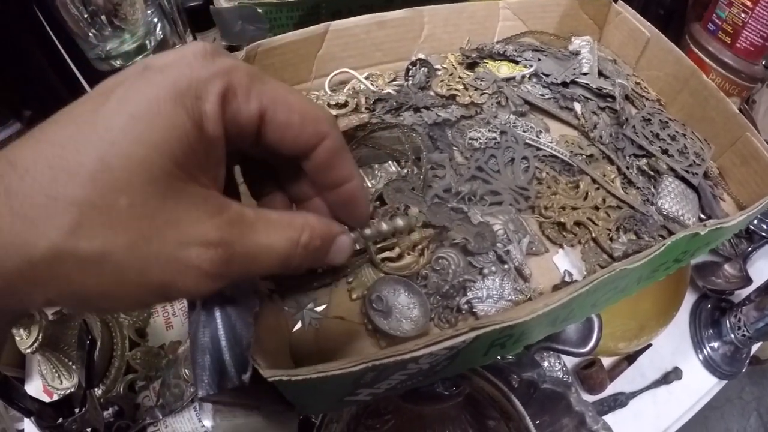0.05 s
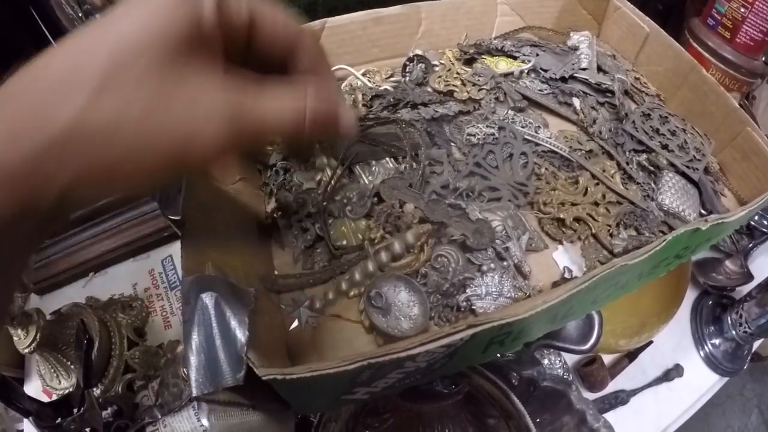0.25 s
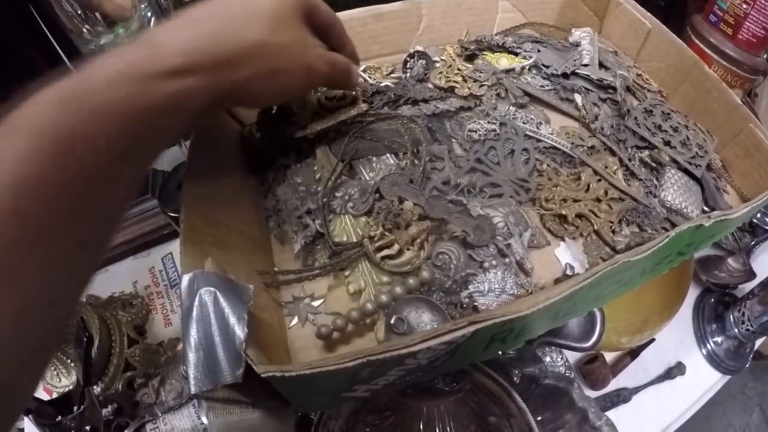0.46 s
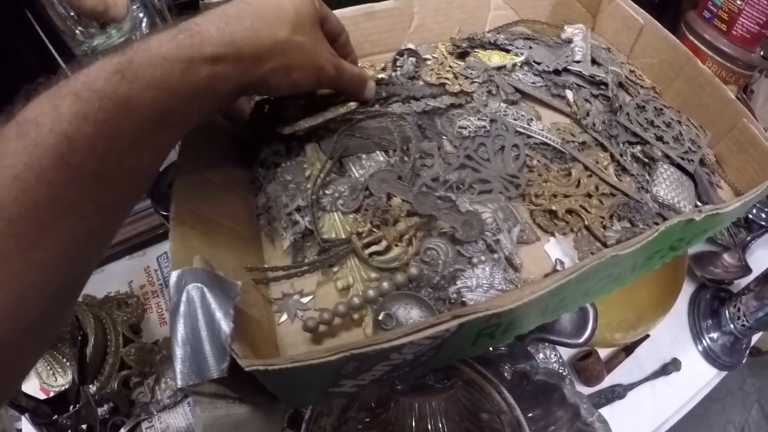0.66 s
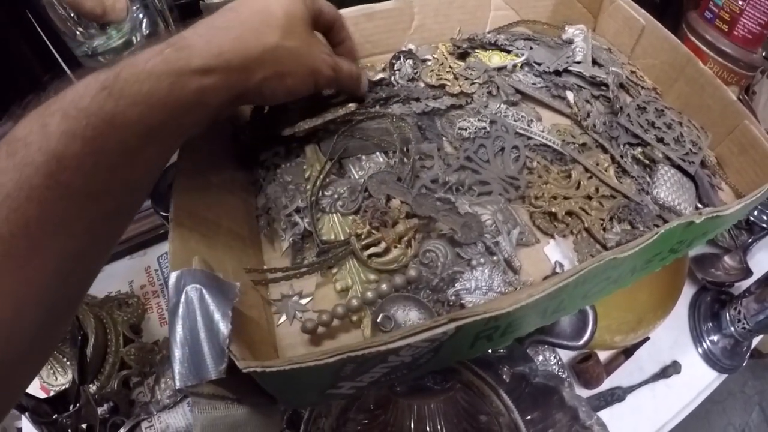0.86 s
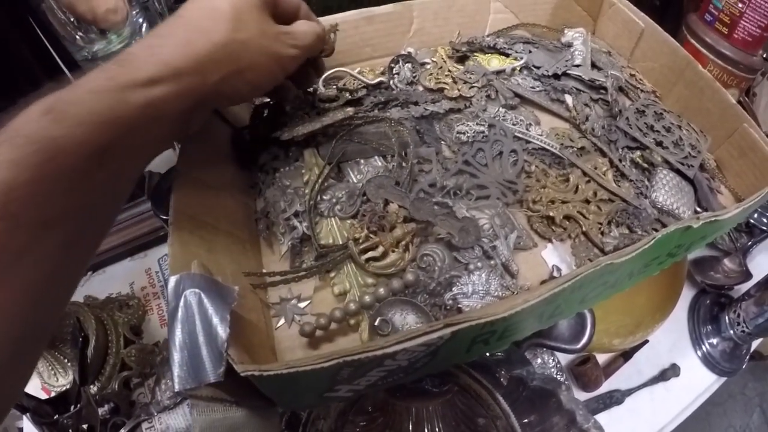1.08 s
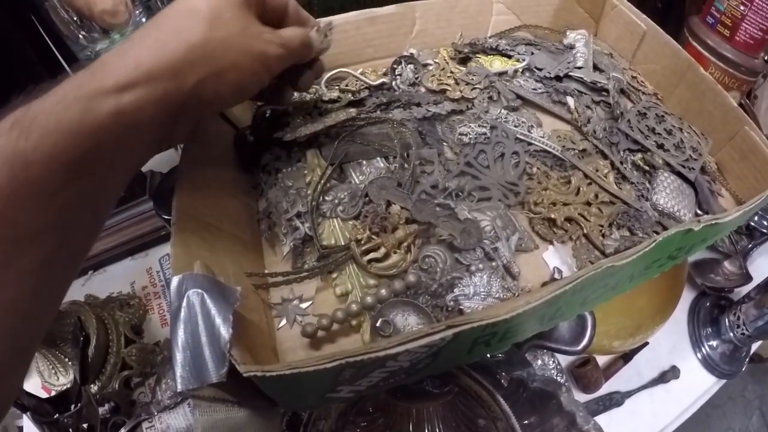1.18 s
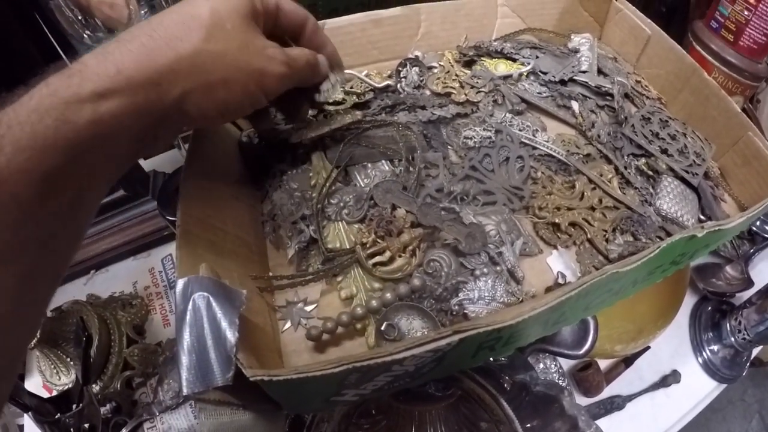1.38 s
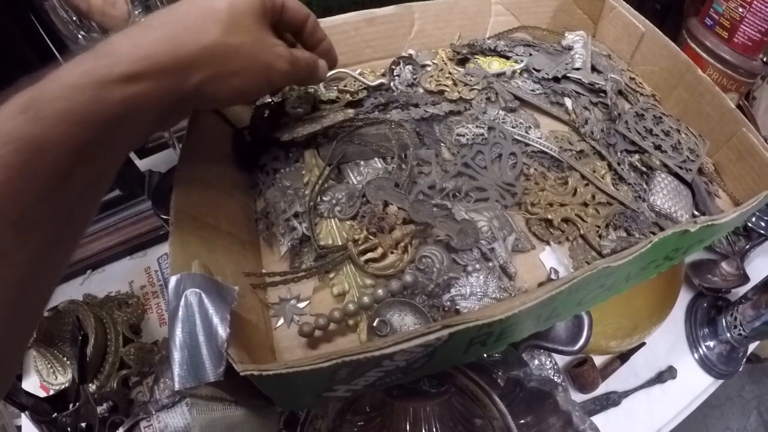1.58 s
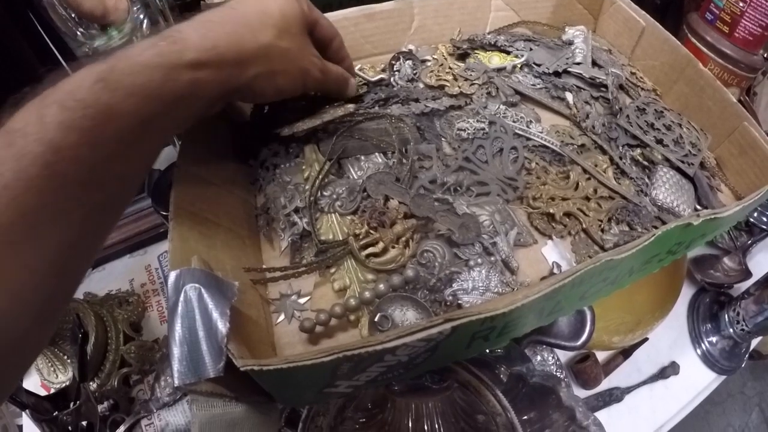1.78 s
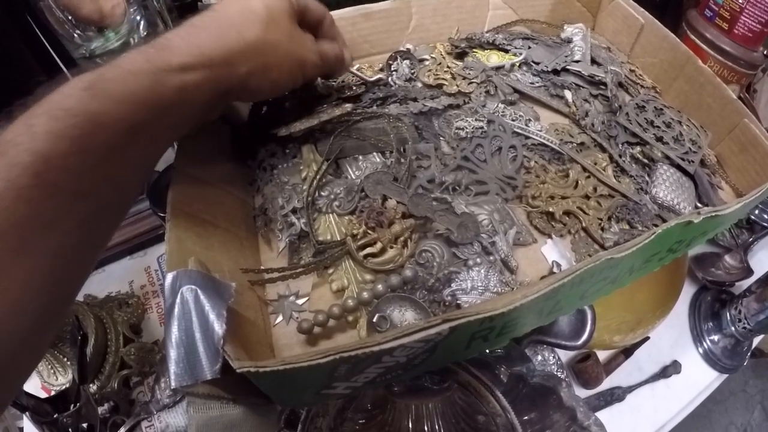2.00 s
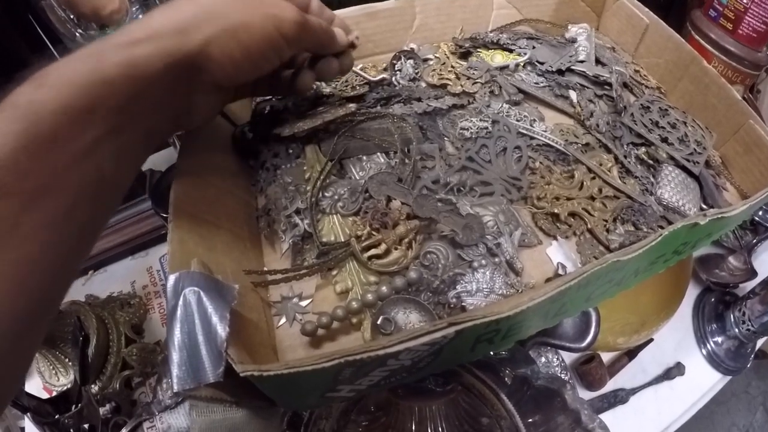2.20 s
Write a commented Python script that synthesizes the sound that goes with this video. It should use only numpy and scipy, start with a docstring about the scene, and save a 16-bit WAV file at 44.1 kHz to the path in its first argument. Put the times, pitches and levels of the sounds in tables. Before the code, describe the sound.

Metal trinkets clatter in a cardboard box: a beaded piece drops, then fingers rummage with light scrapes

```python
"""Small metal trinkets in a cardboard box, heard up close in a quiet storeroom. A beaded piece is dropped and
bounces in the near corner, then fingers rummage in the far corner. Every contact is a burst of tiny collisions
that knocks the cardboard and rattles the damped metal; scrapes are longer streams of the same collisions.
One thin piece rings freely as dying sine tones, joined by single tinkling tones. The room adds a short echo
tail, and filtered noise makes its hiss and low rumble."""
import sys
import numpy as np
from scipy import signal
from scipy.fft import rfft, irfft, next_fast_len
from scipy.io import wavfile

SR = 44100
rng = np.random.default_rng(int(sys.argv[2]) if len(sys.argv) > 2 else 0)


def digitize_waveform(pressure):
    """Quantize a signal to 16-bit integers and store it at the path in sys.argv[1].

    Rows of a 2-D input are taken as channels; values are limited to [-1, 1].
    """
    field = np.atleast_2d(pressure).T
    bounded = np.clip(field, -1, 1)
    quanta = np.round(bounded * 32767).astype(np.int16)
    wavfile.write(sys.argv[1], SR, quanta)


N = 99225

# Contacts in the box: start_s, level_db, pitch_hz (knock), rattle_db, treble_db (of the rattle),
# thump_db (box floor), t60_s (time for the burst to fall 60 dB), tone_db (knock's own tone).
# The dB columns after level_db are relative to it, before the shared levels below.
CONTACTS = [(0.216, -6.5, 836, -13, -10.5, -12, 0.041, -11),
            (0.221, -6.5, 1260, -14, -16.5, -26, 0.05, -10.5), (0.23, -15.5, 556, -7, -9, -25, 0.039, 0),
            (0.248, -20.5, 830, -13, -15, -11, 0.069, -7), (0.271, -23, 620, -7.5, -12, -24, 0.07, -7),
            (0.313, -6.5, 1642, -17, -12, -27.5, 0.042, -7.5),
            (0.318, -5, 1354, -17, -14.5, -50, 0.026, -1.5), (0.334, -29.5, 584, -26, -24, 9, 0.1, 6),
            (0.368, -12, 710, -11, -19.5, -26, 0.048, -3), (0.384, -19, 600, -16, -31, -8.5, 0.043, -17),
            (0.42, -14.5, 732, -14.5, -26, -25, 0.042, 3.5), (0.449, -18.5, 567, -8.5, -16, -11, 0.053, -4),
            (0.467, -21, 684, -11, -43, -40, 0.034, -2.5), (0.484, -22, 775, -30, -36, -21, 0.013, 2),
            (0.504, -24.5, 675, -26, -35, -28, 0.062, -16), (0.52, -28, 1290, -15, -23, -21, 0.085, -7),
            (0.54, -16, 1320, -24, -26, -27, 0.028, -2), (0.544, -15.5, 626, -25, -23, -18, 0.041, -5.5),
            (0.562, -22, 660, -14, -11, -14, 0.05, 1.5), (0.573, -33, 777, -3, -7, -5, 0.066, -10),
            (0.592, -28, 657, -18, -26, -13, 0.044, 1), (0.615, -27, 650, -21, -32, -24, 0.1, -7),
            (0.632, -13.5, 882, -15.5, -20, -6.5, 0.045, -3),
            (0.64, -3.5, 1168, -23, -25.5, -42, 0.05, -3.5), (0.647, -15, 1325, -21, -19, -16, 0.092, -6),
            (0.658, -6, 1040, -18, -25, -19, 0.023, -2), (0.676, -21.5, 944, -17, -21.5, -36, 0.066, -17),
            (0.695, -33, 740, -11, -24, -14, 0.036, -2), (0.747, -30.5, 1070, -11, -19, -26, 0.04, -13),
            (0.749, -18, 1170, -20, -25, -28, 0.039, -0.5), (0.765, -14, 910, -17, -25, -21.5, 0.044, -7),
            (0.786, -14.5, 1030, -17, -20.5, -15, 0.06, -15),
            (0.803, -18.5, 1206, -11, -26, -21, 0.05, -10), (0.815, -16, 1060, -18, -34, -15, 0.031, -9),
            (0.823, -21.5, 814, -18, -34, -30, 0.022, -7),
            (0.848, -21.5, 1054, -15.5, -22, -12, 0.026, -5.5),
            (0.866, -20, 690, -13, -25, -16, 0.039, -10), (0.88, -13.5, 870, -19, -30, -14.5, 0.032, -4),
            (0.89, -18.5, 880, -28, -35, -13, 0.045, -8), (0.898, -27, 825, -15, -33, -35, 0.055, -1.5),
            (0.914, -25.5, 1010, -19, -24, -15, 0.072, -13), (0.934, -22, 1110, -14, -41, -39, 0.04, -9),
            (0.947, -14.5, 1660, -28, -19.5, -34, 0.03, -17), (0.962, -34.5, 1130, -20, 3, -24, 0.043, 5),
            (0.987, -19.5, 805, -14, -17, -16, 0.038, -17), (1.002, -29, 725, -19, -10, -16, 0.035, 3),
            (1.013, -25.5, 950, -26, -4, -15, 0.075, -8), (1.018, -19, 1014, -6, -49, -18, 0.056, -14),
            (1.054, -27, 944, -28, -34, -30, 0.052, -5.5), (1.076, -25.5, 1060, -15, -23, -14, 0.063, -9),
            (1.089, -35.5, 1060, -17, -16, -8, 0.028, -23), (1.122, -30.5, 908, -23, -42, -11, 0.04, -2.5),
            (1.161, -42.5, 946, -34, -36, 0, 0.15, -7.5), (1.513, -23.5, 964, -3, -2, -29, 0.035, -9),
            (1.523, -23.5, 984, -15, -4, -28, 0.055, -3.5),
            (1.584, -37.5, 1070, -15, -15, -8.5, 0.054, -10), (1.618, -35, 1090, -17, 3, -27, 0.16, -14),
            (1.624, -25, 640, -13, -10, -19, 0.025, -3), (1.627, -17, 980, -12.5, -12.5, -25, 0.049, -16),
            (1.635, -16.5, 870, -13, -3, -28, 0.027, -19), (1.646, -25.5, 1156, -12, -30, -33, 0.13, -25),
            (1.654, -25, 1052, -8, -7, -31, 0.032, -13), (1.666, -21.5, 663, -10, -9.5, -38, 0.038, -8.5),
            (1.703, -32, 681, -26, -41, -15, 0.11, -8), (1.72, -34, 630, -12, -29, -32, 0.023, -7),
            (1.847, -32, 1050, -29, -31, -5.5, 0.07, -4.5),
            (1.855, -16.5, 1472, -23.5, -29, -19, 0.034, -11.5),
            (1.866, -23, 1146, -22.5, -28, -37, 0.091, -11),
            (1.878, -15, 866, -23.5, -29, -12.5, 0.091, -14),
            (1.886, -17.5, 980, -26, -35, -22, 0.062, -13), (1.896, -16.5, 1088, -21, -37, -22, 0.061, 2.5),
            (1.911, -13, 1110, -26, -22, -45, 0.042, -18),
            (1.917, -17.5, 1220, -14.5, -37, -32, 0.045, -30), (1.94, -24.5, 1050, -14, -28, -3, 0.044, -6),
            (1.958, -27, 1020, -24, -27, -18, 0.05, -7), (1.965, -16, 978, -27, -28, -13.5, 0.045, -12.5),
            (1.974, -28.5, 1104, -18, -36, -6, 0.13, -13), (1.998, -26, 850, -24, -15, -12, 0.047, -5),
            (2.015, -33, 1190, -8.5, -33, -7, 0.05, -7), (2.036, -29.5, 710, -20, -31, -21, 0.083, -11),
            (2.055, -28, 810, -9, -28, -9, 0.032, -7.5)]
# Scraping strokes, each a list of points: time_s, cardboard_db, metal_db
SCRAPE_STROKES = [
    [(0.21, -75, -70), (0.27, -42, -51), (0.386, -30, -44.5), (0.438, -29.5, -44), (0.578, -51, -68),
     (0.725, -49, -69)],
    [(0.725, -43, -60), (0.819, -38, -47.5), (0.909, -37.5, -75), (0.967, -44, -47), (1.057, -63, -69),
     (1.191, -52, -69.5), (1.35, -69.5, -78.5)],
    [(1.5, -73.5, -78), (1.622, -60.5, -59.5), (1.748, -66, -75), (1.8, -62, -68)],
    [(1.83, -66, -73), (2.014, -56, -75), (2.15, -65, -73)],
]
# Resonances of the cardboard in the near and far corners: pitch_hz, width_hz, level_db
NEAR_CORNER = [(698, 105, 7.5), (1453, 160, 2), (1594, 116, 2), (2203, 130, 0), (2704, 56, -7)]
FAR_CORNER = [(280, 87, -1), (683, 243, 4.5), (870, 130, 5.5), (1142, 266, 1), (1343, 1300, -16.5),
              (2000, 300, -11.5), (2750, 600, -16)]
# Broad tone colour of the cardboard: pitch_hz, level_db (relative)
CARD_COLOUR = [(59, -52), (100, -22), (389, -2), (710, 2.5), (1010, -14.5), (1160, 1.5), (1770, -3),
               (4000, -27), (5200, -59.5), (8800, -120)]
# Broad tone colour of the metal rattle: pitch_hz, level_db (relative)
METAL_COLOUR = [(1200, -31.5), (2000, -12), (2500, 2.5), (4000, 2), (7000, -3), (10000, -7.5),
                (15000, -11.5)]
# Notes of the thin piece: pitch_hz, level_db (relative), t60_s (when ringing freely)
THIN_PIECE = [(1900, -20, .2), (3005, -16, .18), (3742, -5, .18), (8300, -5, .15), (8478, -5, .16),
              (9250, -16, .08), (10190, -11, .25), (12040, -16, .2), (13070, -21, .08), (13910, -23, .1),
              (15005, -16, .09)]
# Strikes on the thin piece: start_s, level_db, ring_share (multiplies t60_s; fingers change how freely it rings),
# tilt_db (per octave, around 8000 Hz)
STRIKES = [(1.514, -40, 1.16, -2), (1.59, -51, 1.9, 2), (1.621, -51, 0.71, 3), (1.629, -26, 0.58, 3.5),
           (1.643, -30, 0.49, 0), (1.651, -38, 1, -2.5), (1.663, -32, 0.26, -10), (1.708, -64, 0.55, -10)]
# Single dying tones, some of them extra notes of the thin piece: start_s, pitch_hz, level_db, t60_s
TINKLES = [(.217, 11550, -42, .2), (.451, 6400, -40, .03), (.503, 6300, -42, .04), (.503, 10500, -50, .05),
           (.786, 6900, -48, .08), (.916, 9200, -57, .08), (.916, 14770, -58, .08), (.949, 15040, -55, .12),
           (.965, 8700, -52, .03), (.987, 15040, -53, .1), (.995, 5150, -50, .04), (1.018, 14900, -53, .1),
           (1.018, 2700, -40, .035), (1.03, 9200, -62, .12), (1.642, 9250, -38, .07),
           (1.513, 4800, -26, .03), (1.513, 3200, -32, .025), (1.999, 9300, -57, .04),
           (1.999, 12620, -63, .3), (2.085, 870, -55, .6)]
# Resonances of the dropped beaded piece: pitch_hz, width_hz, level_db
BEAD_MODES = [(4454, 145, 15), (4967, 65, 10.5), (6170, 190, 18), (8640, 90, 13.5), (9865, 52, 19),
              (10400, 32, 13.5), (12400, 39, 1), (12900, 54, 16), (13800, 140, 12), (14620, 120, 9)]
# Tone colour of the room hiss: pitch_hz, level_db (relative)
HISS_COLOUR = [(35, -32), (60, -2), (282, -18.5), (875, -23), (960, -29.5), (1180, -23), (15000, -41)]
# Level of the low rumble: time_s, level_db
RUMBLE_LEVEL = [(0.0, -61.5), (0.19, -60), (0.24, -37.5), (0.61, -52), (0.649, -36.5), (0.71, -53),
                (1.58, -56.5), (2.1, -55), (2.25, -44)]
# How long the room's tail lasts: pitch_hz, t60_s
ROOM_DECAY = [(200, 0.34), (2000, 0.14), (12000, 0.13)]

MOVE_S = 0.61  # the action moves from the near to the far corner
COLLISIONS_HZ = 5000  # average tiny collisions a second
RISE_S, SOFT_RISE_S, CLEAR_RISE_S = 0.00097, 0.0015, 0.0029  # sharp start, soft start, extra rise of the clear ring
BRIGHT_DB = -15  # contacts with more rattle than this are free metal blows and start sharply
BLOW_DB, BLOW_S = 10.5, 0.002  # one hard collision early in each burst: extra level, delay
KNOCK_WIDTH_HZ, ROUGH_DB, CLEAR_DB = 73, -7.5, 3.5  # rough and clear ring of each knock
CLEAR_SHARE = 0.62  # the clear ring dies sooner than the burst
BODY_DB, BROAD_DB, RATTLE_DB = -10, -13, 0.5  # corner resonances, broad cardboard, metal
THUD_DB, THUD_HZ, THUD_T60_S = -36.5, 68.5, 0.045
THUMP_DB, THUMP_HZ, THUMP_WIDTH_HZ = -10.5, 245.5, 210  # the box floor
THUMP_RING_DB, THUMP_T60_S = 3, 0.074  # its clear note, over the thump
HEAP_DB = -3  # resonances of the pieces touched, over the plain rattle
RATTLE_MID_HZ, RATTLE_TREBLE_HZ = 7000 / 2.48, 14000  # where rattle_db and treble_db apply
WAVER_DB, WAVER_S = 4, 0.006  # typical random level change, time between changes
HISS_DB, ROOM_DB = -59.5, -11.5
ROLL_HZ, ROLL_DB, TOP_HZ = 15250, -35, 16550  # treble fade start, depth after 500 Hz, upper limit


def amp(db):
    """Turn decibels into a plain multiplier."""
    return 10 ** (np.asarray(db) / 20)


def unit(x):
    """Scale x to an average (rms) level of 1."""
    return x / np.sqrt(np.mean(x ** 2) + 1e-20)


def along(points, hz):
    """Read values between (pitch, value) points on a log pitch axis."""
    f, v = np.transpose(points)
    return np.interp(np.log(hz + 1), np.log(f + 1), v)


def filtered(x, response):
    """Multiply the spectrum of x by a response that depends on pitch."""
    m = next_fast_len(len(x) + 8192)
    spectrum = rfft(x, m) * response(np.fft.rfftfreq(m, 1 / SR))
    return irfft(spectrum, m)[:len(x)]


def coloured(x, points):
    """Give x a tone colour with unit power gain, with no sound ahead of its cause."""
    level = amp(along(points, np.fft.rfftfreq(4096, 1 / SR)))
    cepstrum = irfft(np.log(level + 1e-6))
    # Folding the second half onto the first makes the filter respond as early as it can.
    cepstrum[1:2048] *= 2
    cepstrum[2049:] = 0
    h = irfft(np.exp(rfft(cepstrum)))
    return signal.fftconvolve(x, h / np.linalg.norm(h))[:len(x)]


def resonant(x, peaks):
    """Pass x through resonances of alternating sign, with unit power gain."""
    def response(f):
        total = 0
        for k, (centre, width, db) in enumerate(peaks):
            peak = 1j * f * width / (centre * centre - f * f + 1j * f * width)
            total = total + (-1) ** k * amp(db) * peak
        return total / np.sqrt(np.mean(abs(total) ** 2))
    return filtered(x, response)


def collisions(size):
    """Tiny collisions: sparse spikes of uneven size on a bed of noise, rms 1."""
    spikes = (rng.random(size) < COLLISIONS_HZ / SR) * rng.standard_normal(size)
    return unit(unit(spikes) + 0.5 * rng.standard_normal(size))


def add(track, s, x):
    """Lay x into track at time s, cutting what runs past the end."""
    part = track[round(s * SR):][:len(x)]
    part += x[:len(part)]


def ring(hz, db, t60, t):
    """A dying sine with a short rise, like one note of a struck object."""
    return amp(db - 60 * t / t60) * np.sin(2 * np.pi * hz * t) * (1 - np.exp(-t / RISE_S))


def background():
    """Steady room hiss and a low rumble that comes and goes, both filtered noise."""
    hiss = unit(filtered(rng.standard_normal(N), lambda hz: amp(along(HISS_COLOUR, hz)) * (hz > 60)))
    rumble = unit(filtered(rng.standard_normal(N), lambda hz: hz / (1 + (hz / 35) ** 3)))
    s, db = np.transpose(RUMBLE_LEVEL)
    return amp(HISS_DB) * hiss + amp(np.interp(np.arange(N) / SR, s, db)) * rumble


def corners(drive):
    """Cardboard resonates differently in the near corner and, later, the far one."""
    near = np.arange(N) / SR < MOVE_S
    return resonant(drive * near, NEAR_CORNER) + resonant(drive * ~near, FAR_CORNER)


def scrapes():
    """Strokes drag over cardboard and metal, driving both with streams of tiny collisions."""
    now = np.arange(N) / SR
    s, card_db, metal_db = np.transpose([row for stroke in SCRAPE_STROKES for row in stroke])
    stroking = sum((now > stroke[0][0]) & (now < stroke[-1][0]) for stroke in SCRAPE_STROKES)
    card = stroking * amp(np.interp(now, s, card_db)) * collisions(N)
    metal = stroking * amp(np.interp(now, s, metal_db)) * collisions(N)
    return 0.55 * corners(card) + 0.36 * coloured(card, CARD_COLOUR) + coloured(metal, METAL_COLOUR)


def rattle(burst, mid_db, treble_db, dropped):
    """Damped metal: random resonances for each contact, plus the fixed ones of the dropped piece."""
    modes = [(3000 + 12000 * a ** 1.2, 90 * (1 + 2 * b), 6 * c) for a, b, c in rng.random((30, 3))]
    if dropped:
        modes = modes[:15] + list(BEAD_MODES)
    mixed = (burst + amp(HEAP_DB) * resonant(burst, modes)) / np.hypot(1, amp(HEAP_DB))
    balance = [(RATTLE_MID_HZ, mid_db), (RATTLE_TREBLE_HZ, treble_db)]
    return filtered(mixed, lambda hz: amp(along(balance, hz)))


def contacts():
    """Each contact's burst of collisions knocks the cardboard, thumps the floor and rattles the metal."""
    card, floor, metal, direct = np.zeros((4, N))
    t = np.arange(SR // 5) / SR
    for s, db, hz, mid_db, treble_db, thump_db, t60, tone_db in CONTACTS:
        dropped = s < MOVE_S
        # Other contacts under the fingers start more gently.
        rise = RISE_S if dropped or mid_db > BRIGHT_DB else SOFT_RISE_S
        shape = amp(db - 60 * t / t60) * (1 - np.exp(-t / rise))
        blow = amp(db + BLOW_DB) * (np.arange(len(t)) == round(BLOW_S * SR))
        burst = shape * collisions(len(t)) + blow
        metal_burst = amp(RATTLE_DB) * (shape * collisions(len(t)) + blow)
        add(card, s, burst)
        add(floor, s, amp(thump_db + THUMP_DB) * burst)
        add(metal, s, rattle(metal_burst, mid_db, treble_db, dropped))

        rough = amp(tone_db + ROUGH_DB) * resonant(burst, [(hz, KNOCK_WIDTH_HZ, 0)])
        clear = ring(hz, db + tone_db + CLEAR_DB, CLEAR_SHARE * t60, t) * (1 - np.exp(-t / CLEAR_RISE_S))
        thud = ring(THUD_HZ, db + THUD_DB, THUD_T60_S, t)
        floor_note = ring(THUMP_HZ, db + thump_db + THUMP_DB + THUMP_RING_DB, THUMP_T60_S, t)
        add(direct, s, rough + clear + thud + floor_note)
    cardboard = amp(BODY_DB) * corners(card) + amp(BROAD_DB) * coloured(card, CARD_COLOUR)
    thump = resonant(floor, [(THUMP_HZ, THUMP_WIDTH_HZ, 0)])
    return direct + cardboard + thump + coloured(metal, METAL_COLOUR)


def chimes():
    """The thin piece rings anew at each strike; single dying tones add tinkles, some of them its extra notes."""
    out = np.zeros(N)
    t = np.arange(SR // 2) / SR
    for s, db, ring_share, tilt_db in STRIKES:
        for hz, level, t60 in THIN_PIECE:
            # Each note's level wavers at random as it dies.
            waver_db = WAVER_DB * np.interp(t / WAVER_S, np.arange(100), rng.standard_normal(100))
            note_db = db + level + tilt_db * np.log2(hz / 8000) + waver_db
            add(out, s, ring(hz, note_db, t60 * ring_share, t))
    for s, hz, db, t60 in TINKLES:
        add(out, s, ring(hz, db, t60, t))
    return out


def room(x):
    """A short blurred answer from shelves and walls: noise that dies at its own pace at each pitch."""
    hz, t, z = signal.stft(rng.standard_normal(SR // 2), SR, nperseg=256)
    fade = amp(-60 * t / along(ROOM_DECAY, hz)[:, None])
    tail = signal.istft(z * fade, SR, nperseg=256)[1]
    late = np.pad(x, (200, 0))  # the answer starts 200 samples late
    return signal.fftconvolve(late, tail / np.linalg.norm(tail))[:N]


def scene():
    """Box, metal, room and background together."""
    trinkets = scrapes() + contacts() + chimes()
    return (trinkets + amp(ROOM_DB) * room(trinkets) + background())[None]


def record(dry):
    """The camera fades the top treble steeply and keeps nothing from its upper limit on."""
    def response(hz):
        fade = np.clip((hz - ROLL_HZ) / 500, 0, 1)
        return amp(ROLL_DB * fade) * (hz < TOP_HZ)
    return filtered(dry[0], response)[None]


dry = scene()
out = record(dry)
digitize_waveform(out)
```